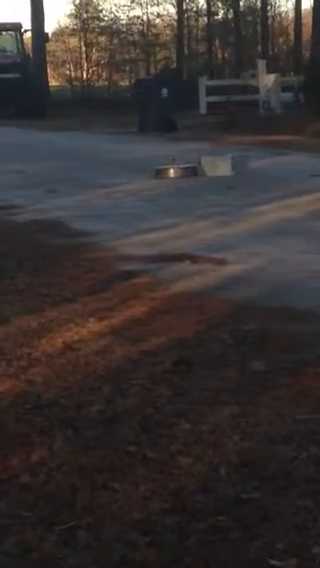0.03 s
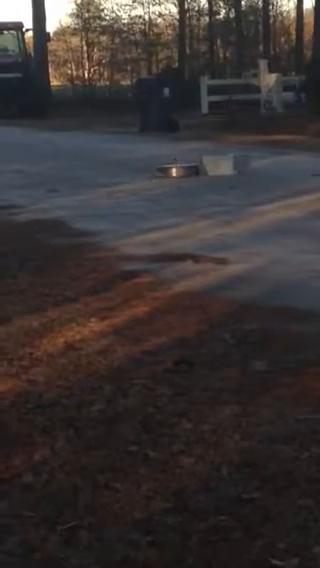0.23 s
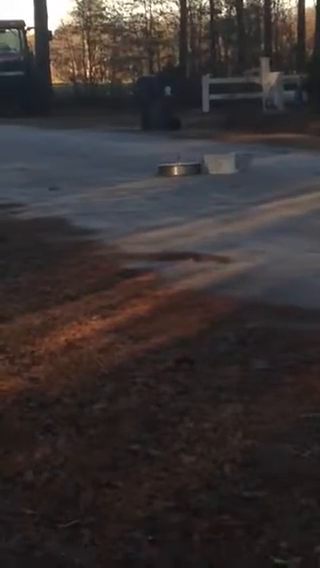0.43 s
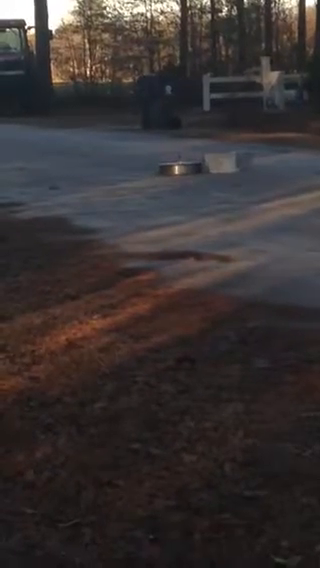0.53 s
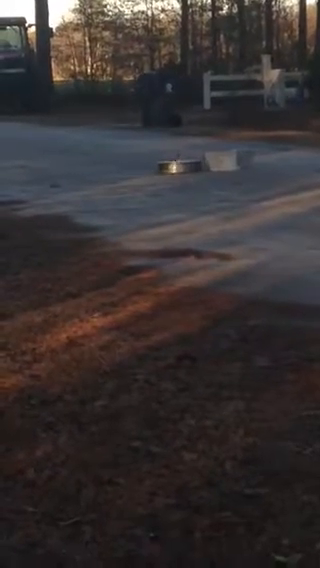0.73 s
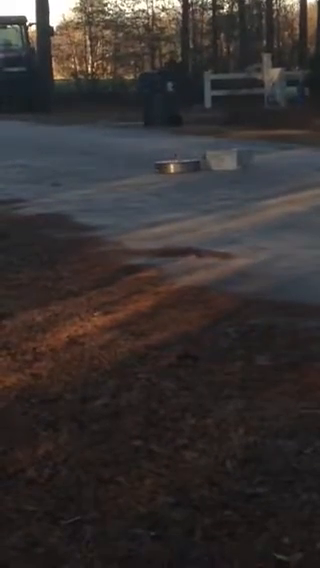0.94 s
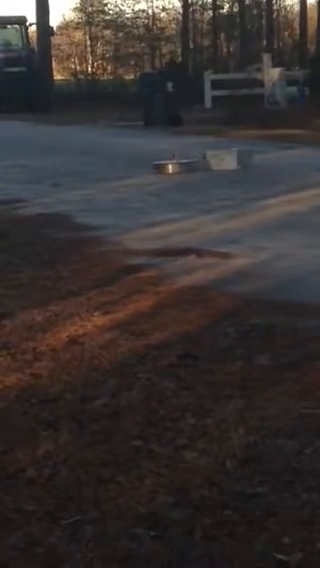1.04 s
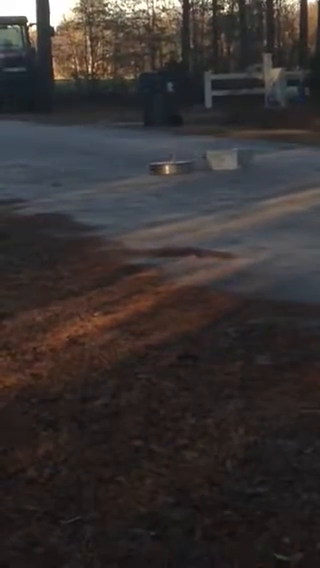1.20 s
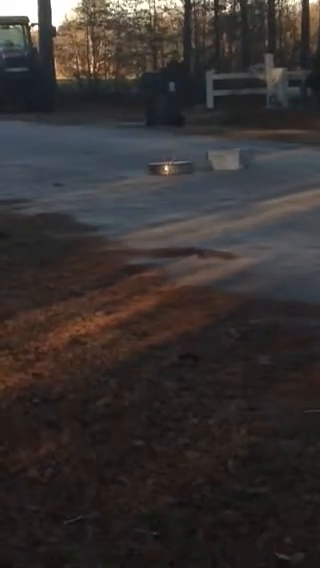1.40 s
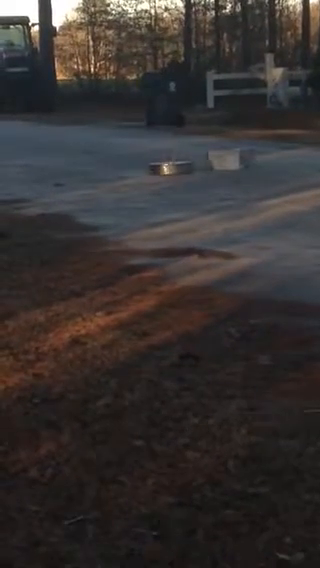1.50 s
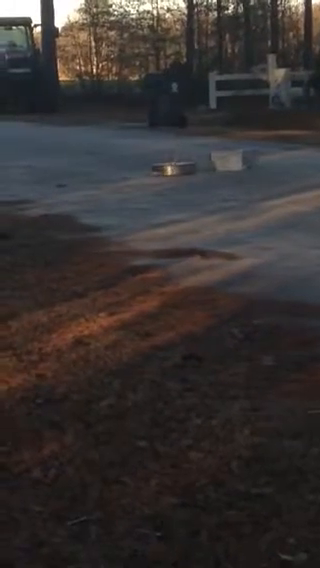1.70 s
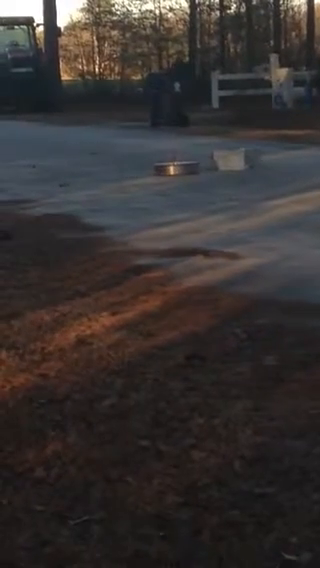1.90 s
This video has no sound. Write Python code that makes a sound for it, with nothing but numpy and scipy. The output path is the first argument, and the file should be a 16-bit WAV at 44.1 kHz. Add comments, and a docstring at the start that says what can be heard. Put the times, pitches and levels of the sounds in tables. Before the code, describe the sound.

A rapid metallic clatter starts at about 0.2 seconds as a small combat robot's spinning weapon hits another robot some metres away, each sharp blow ringing. After 0.5 seconds the hits become sparser grazes, stopping by 0.8 seconds and fading with a light outdoor echo. One faint scuff comes near 1.3 seconds. A quiet hum, slight rasp and wavering whine continue until about 2 seconds.

```python
"""Over a faint outdoor hum, two small combat robots meet on a driveway some metres away. From 0.2 s a
spinning weapon strikes about every 32 ms: each blow chatters briefly in the shells and sets a steel part
ringing, and the yard and trees scatter the sound back. After 0.5 s the weapon only grazes, on about every
other beat, and by 0.8 s it has stopped striking. The ringing dies away and the robots part with one faint
scuff, leaving the hum, a slight rasp and a whine that comes and goes."""
import sys
import numpy as np
from scipy import signal
from scipy.fft import rfft, irfft
from scipy.io import wavfile
from scipy.ndimage import uniform_filter1d

SR = 44100
rng = np.random.default_rng(int(sys.argv[2]) if len(sys.argv) > 2 else 0)


def to_wav(sig):
    """Store sig (one row per channel, or 1-D mono) as 16-bit WAV at the path in sys.argv[1].

    Samples outside -1..1 are clipped; the rate is SR.
    """
    pcm = np.clip(np.atleast_2d(sig), -1, 1) * 32767
    pcm = np.round(pcm).astype(np.int16)
    wavfile.write(sys.argv[1], SR, pcm.T)  # frames by channels


N = 85995
T = np.arange(N) / SR
FREQS = np.maximum(np.arange(N + 1) * SR / (2 * N), 1)  # bins of a spectrum of 2 N samples

# blows of the weapon: start_s, contact_s, thud_db, clank_db, crack_db, sizzle_db, ring_db
BLOWS = [ (.2050, 0.0035, -32, -34.5, -25.5, -26.5, -10.5), (0.2085, 0.0082, -35.5, -26, -20.5, -29, -19),
         (0.2373, 0.0021, -32.5, -22.5, -23, -33, -3), (0.2406, 0.003, -32, -26.5, -13, -18, -0.5),
         (0.252, 0.0062, -37, -27, -32, -29, -14.5), (0.2717, 0.0051, -30.5, -21, -17, -19.5, 2.5),
         (0.3023, 0.0087, -39.5, -28, -23.5, -23.5, 0.5), (0.3341, .003, -42, -27.5, -16.5, -19.5, -18),
         (0.3377, 0.0032, -37, -22, -12.5, -46, -17.5), (0.361, 0.01, -56, -41, -35.5, -31.5, -16.5),
         (0.3928, 0.0057, -45.5, -39.5, -21, -25, -8), (0.397, 0.0046, -37, -29, -18, -22.5, 2.5),
         (0.425, .001, -42.5, -31.5, -13.5, -23, -1.5), (.4290, 0.00314, -57.5, -22, -21.5, -24.5, -13.5),
         (.4560, 0.00089, -35.5, -19, -26, -24, 3), (0.4592, 0.0037, -43.5, -23, -21, -21.5, 2),
         (0.488, 0.00091, -45.5, -18.5, -49, -33, -11), (0.522, 0.0041, -54, -31.5, -26.5, -25, -29),
         (0.649, 0.0045, -58.5, -37, -27.5, -27, -22), (0.7058, 0.00021, -44, -51, -32, -22, -11.5),
         (0.7122, 0.0031, -60, -34.5, -21, -22, -13), (0.7159, 0.0021, -49.5, -28, -26, -56, -16.5),
         (0.773, 0.006, -52, -65, -84, -35.5, -37)]


def undb(db):
    """Amplitude ratio of a level in decibels."""
    return 10 ** (np.asarray(db) / 20)


def unit(x):
    """Normalisation to rms 1."""
    return x / np.sqrt(np.mean(x ** 2))


def colour(x, points, size=2048):
    """Minimum-phase filtering through (frequency_hz, gain_db) points, by folding the cepstrum."""
    hz, db = np.array(points, float).T
    bins_hz = np.maximum(np.arange(size // 2 + 1) * SR / size, 1)
    gain = undb(np.interp(np.log(bins_hz), np.log(hz), db))
    cepstrum = irfft(np.log(gain))
    cepstrum[1:size // 2] *= 2
    cepstrum[size // 2 + 1:] = 0
    return signal.fftconvolve(x, irfft(np.exp(rfft(cepstrum))))[:len(x)]


def add(out, start_s, x):
    """Superposition of x on out from a given time."""
    i = int(start_s * SR)
    out[i:i + len(x)] += x[:N - i]


def walk(knots_per_s):
    """Slow random modulation: straight lines between Gaussian values of spread 1."""
    knots = rng.standard_normal(256)
    return np.interp(T * knots_per_s, np.arange(len(knots)), knots)


def wavering(hz, width_hz):
    """Narrow-band noise of rms 1: its components beat, so it is heard as an unsteady tone."""
    passband = np.exp(-((FREQS - hz) / width_hz) ** 2)
    return unit(irfft(rfft(rng.standard_normal(2 * N)) * passband)[:N])


def scatter(t60_s, rise_s, size=N):
    """Diffuse reverberation: dense reflections build up and decay exponentially, with unit energy."""
    t = T[:size]
    cloud = rng.standard_normal(size) * undb(-60 * t / t60_s) * (1 - np.exp(-(t / rise_s) ** 2))
    return cloud / np.sqrt(np.sum(cloud ** 2))


def outdoor_air():
    """Broadband ambient noise that slowly fades, each octave flickering a little on its own."""
    # ambient spectrum: frequency_hz, level_db
    air_spectrum = [(25, -23), (45, -11), (75, -2), (170, -5.5), (300, -11.5), (520, -10), (950, -9.5),
                    (1300, -12), (2000, -13.5), (2400, -16.5), (4000, -17.5), (5600, -30.5), (8000, -37),
                    (15000, -44.5)]
    start_db, fall_db_per_s, flicker_db = -53, 1.24, 0.5
    spectrum = rfft(unit(colour(rng.standard_normal(2 * N), air_spectrum, size=8192)))
    out = np.zeros(N)
    for octave in range(4, 15):
        passband = np.maximum(1 - abs(np.log2(FREQS) - octave), 0)
        out += irfft(spectrum * passband)[N:] * undb(flicker_db * walk(17))
    return out * undb(start_db - fall_db_per_s * T)


def hum():
    """A narrow band of low noise, heard as a faint, unsteady hum."""
    return undb(-71.5 + 2 * walk(10)) * wavering(hz=79.8, width_hz=32)


def whine():
    """Slow amplitude modulation makes three faint, narrow bands come and go."""
    # tones of the whine: pitch_hz, level_db
    tones = [(1190, -70), (1440, -71), (1750, -69)]
    return sum(wavering(hz, width_hz=65) * undb(db + 3.5 * walk(12.12)) for hz, db in tones)


def whirs():
    """Under a brief Gaussian envelope, one tone at a time stands clear of the whine."""
    # swells: peak_s, pitch_hz, level_db
    swells = [(.99, 1182, -59), (1.775, 1185, -59), (1.84, 1425, -58), (1.89, 1750, -63.5),
              (1.925, 2345, -60)]
    half_width_s = 0.033
    out = np.zeros(N)
    for peak_s, hz, db in swells:
        envelope = np.exp(-((T - peak_s) / half_width_s) ** 2)
        out += undb(db) * envelope * np.sin(2 * np.pi * hz * T + .5 * walk(50))
    return out


def grit():
    """Randomly modulated band noise: a faint, uneven rasp, as of wheels on the paving."""
    return wavering(hz=2320, width_hz=160) * undb(-66.5 + 4 * walk(27.94))


def trees(x):
    """Scattering from the trees returns a long, faint tail whose treble decays first."""
    # response of the trees: frequency_hz, gain_db
    tree_response = [(150, -7.5), (500, -10), (1300, -8.5), (3500, -14.5), (7000, -15.5), (14000, -33.5)]
    tail = colour(scatter(t60_s=1.41, rise_s=0.03), [(2500, -0.5), (4500, -3), (8000, -31.5)])
    treble = colour(scatter(t60_s=0.65, rise_s=0.03), [(2000, -25.5), (6000, 2.0)])
    return undb(-1.5) * signal.fftconvolve(x, colour(tail + treble, tree_response))[:N]


def echo(x):
    """One reflection from across the drive arrives delayed, smeared and dulled."""
    # response of the echo path: frequency_hz, gain_db
    path_response = [(300, -4.5), (1500, -3), (3600, -2), (7000, -10.5), (14000, -17.5)]
    smeared = signal.fftconvolve(x, scatter(t60_s=0.096, rise_s=0.0023, size=4096))[:N]
    out = np.zeros(N)
    add(out, start_s=.047, x=undb(-18) * colour(smeared, path_response))
    return out


def chatter(contact_s, size=4096):
    """Intermittent contact: a tick, then micro-impacts that build, hold and die, with a flat spectrum."""
    attack_s, release_s, impacts_per_s, spread_db = .12 * contact_s, 0.0035, 7000, 4.5
    t = T[:size]
    envelope = np.exp(-np.maximum(t - contact_s, 0) / release_s) * (1 - np.exp(-t / attack_s))
    strengths = rng.choice([-1, 1], size) * undb(spread_db * rng.standard_normal(size))
    touches = rng.random(size) < impacts_per_s / SR
    clicks = envelope * unit(strengths * touches)
    clicks[:16] += rng.choice([-1, 1], size=16)  # the first tick
    spectrum = rfft(clicks)
    spectrum /= np.sqrt(uniform_filter1d(abs(spectrum) ** 2, size=128))  # whitening
    return irfft(spectrum) * np.sqrt(np.sum(envelope ** 2)) * (t < t[-1] / 2)


def scuff():
    """Sliding friction on the paving makes a thin, quiet scrape as the robots part."""
    # scrape: start_s, contact_s, level_db
    scrapes = [(1.284, 0.011, -62)]
    out = np.zeros(N)
    for start_s, contact_s, db in scrapes:
        add(out, start_s, undb(db) * chatter(contact_s))
    return colour(out, [(1000, -16.0), (4000, 11.0), (9000, -4.5), (15000, -1)])


def knocks():
    """Heavy blows excite the low, strongly damped modes of the hollow shell."""
    # modes of the hollow shell: pitch_hz, level_db, t60_s
    modes = [(537, -3.5, 0.063), (613, -4.5, 0.066), (685, -1, 0.065)]
    # heavy blows: start_s, gain_db
    strikes = [(.2725, -24.5), (.3348, -26.5), (.3978, -27.5), (.4562, -32)]
    out, t, rise_s = np.zeros(N), T[:8192], .002
    knock = sum(undb(db - 60 * t / t60_s) * np.sin(2 * np.pi * hz * t) for hz, db, t60_s in modes)
    knock *= 1 - np.exp(-t / rise_s)
    for start_s, db in strikes:
        add(out, start_s, undb(db) * knock)
    return out


def clacks():
    """Damped free vibration: a panel struck squarely rings briefly at its own pitch."""
    # square hits on single panels: start_s, pitch_hz, level_db
    strikes = [(.241, 4100, -19.5), (.274, 2350, -27), (.303, 4085, -28), (.425, 5120, -28.5),
               (.652, 1187, -37), (.715, 1180, -35), (.716, 2765, -34)]
    t60_s, rise_s = 0.099, .002
    out, t = np.zeros(N), T[:8192]
    envelope = undb(-60 * t / t60_s) * (1 - np.exp(-t / rise_s))
    for start_s, hz, db in strikes:
        phase = 2 * np.pi * hz * t + .5 * walk(90)[:len(t)]
        add(out, start_s, undb(db) * envelope * np.sin(phase))
    return out


def steel():
    """Each blow adds energy to the steel modes, which decay exponentially and waver as the part moves."""
    # modes of the steel part, one list each: pitch_hz, level_db, t60_s
    pitch_hz = [1536.7, 1787.6, 1852.4, 1915.6, 1977, 2074, 2131.3, 2345, 2497, 3312, 3537, 3698.7, 4063]
    level_db = [-34.5, -34.5, -34, -38, -36.5, -34.5, -37.5, -30.5, -32.5, -39.5, -43.5, -44, -45]
    t60_s = [0.36, 0.303, 0.37, 0.84, 0.32, 0.27, 0.47, 0.085, 0.083, 0.33, 0.53, 0.44, 0.246]
    waver_db = 1.5
    kicks, out = np.zeros(N), np.zeros(N)
    for start_s, *_, ring_db in BLOWS:
        kicks[int(start_s * SR)] += undb(ring_db) ** 2
    for hz, db, t60 in zip(pitch_hz, level_db, t60_s):
        kept_per_sample = np.exp(-2 * np.log(1000) / (t60 * SR))
        energy = signal.lfilter([1], [1, -kept_per_sample], kicks)
        phase = 2 * np.pi * (hz * T + rng.random()) + .3 * walk(30)
        out += np.sqrt(energy) * undb(db + waver_db * walk(35)) * np.sin(phase)
    return undb(-3.5) * out


def shell_resonance(x):
    """Forced vibration: the panels resonate briefly and the shells impose their broad colour."""
    # panel resonances: pitch_hz, gain_db, t60_s
    panels = [(1081, -3, 0.043), (2454, 0.5, 0.11), (4540, -8, 0.0784)]
    # response of the shells: frequency_hz, gain_db
    shell_response = [(60, -33.5), (170, -6.5), (330, -7), (620, 2), (790, 0), (1100, 3), (1600, -0.5),
                      (2400, 0.5), (2850, -0.5), (4200, 2), (5400, -1), (9000, -0.5), (14800, -4)]
    t, ring = T[:8192], 0
    for hz, db, t60_s in panels:
        amplitude = undb(db) * 2 * np.log(1000) / (t60_s * SR)  # resonant gain independent of damping
        ring += amplitude * undb(-60 * t / t60_s) * np.cos(2 * np.pi * hz * t)
    return undb(-4) * colour(x + signal.fftconvolve(x, ring)[:N], shell_response)


def shell_impacts():
    """Impacts drive the shells, each with its own spectrum and, as the robots move, its own reflections."""
    # bands of thud, clank, crack and sizzle: centre_hz
    centres_hz = [420, 1500, 3700, 9500]
    # response of the yard: frequency_hz, gain_db
    yard_response = [(150, 3.5), (500, -4.5), (1300, -1.5), (3500, 0), (6000, -6.5), (14000, -8.5)]
    widths_hz = np.array([600, 1600, 3600, 9000])
    direct, yard = np.zeros(N), np.zeros(N)
    for start_s, contact_s, *bands_db, _ in BLOWS:
        density_db = np.array(bands_db) - 10 * np.log10(2 * widths_hz / SR)
        balance = list(zip(centres_hz, density_db))
        contact = chatter(contact_s)
        reflections = scatter(t60_s=0.25, rise_s=0.0027 + contact_s / 2, size=16384)
        reflections *= np.sqrt(np.sum(contact ** 2))
        add(direct, start_s, colour(contact, balance))
        add(yard, start_s + contact_s / 2, colour(reflections, balance))
    return shell_resonance(direct + colour(yard, yard_response) + echo(direct))


def scene():
    """Superposition of the clash, its reverberation and the background, in one channel."""
    hits = shell_impacts() + scuff() + knocks() + clacks()
    ring = steel()
    tail = trees(hits + undb(-6) * ring)
    background = outdoor_air() + whine() + hum() + grit() + whirs()
    return (hits + ring + tail + background)[None]


def record(dry):
    """Soft saturation rounds the highest peaks, and a steep low-pass filter cuts the top."""
    ceiling, cutoff_hz = undb(-3), 15050
    rounded = ceiling * np.tanh(dry / ceiling)
    return signal.sosfilt(signal.ellip(8, .2, 70, cutoff_hz, fs=SR, output="sos"), rounded)


dry = scene()
out = record(dry)
to_wav(out)
```